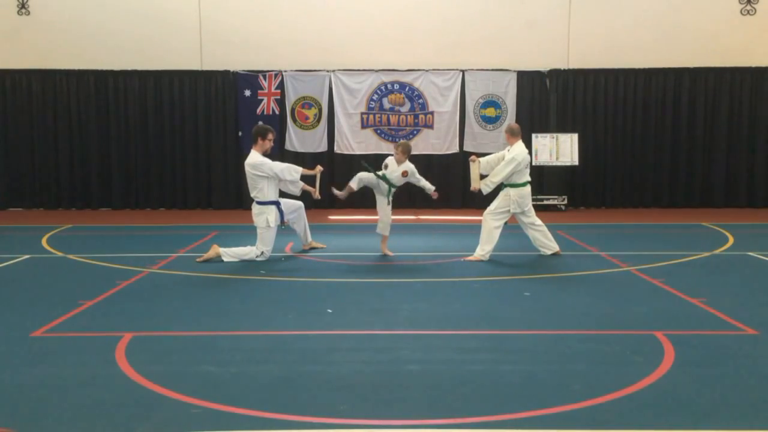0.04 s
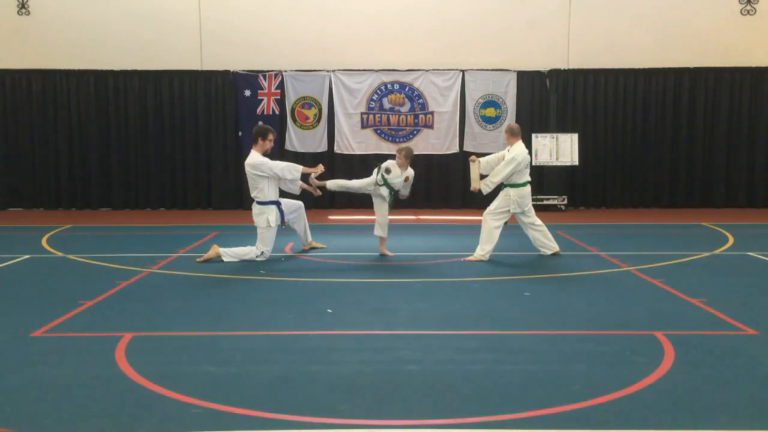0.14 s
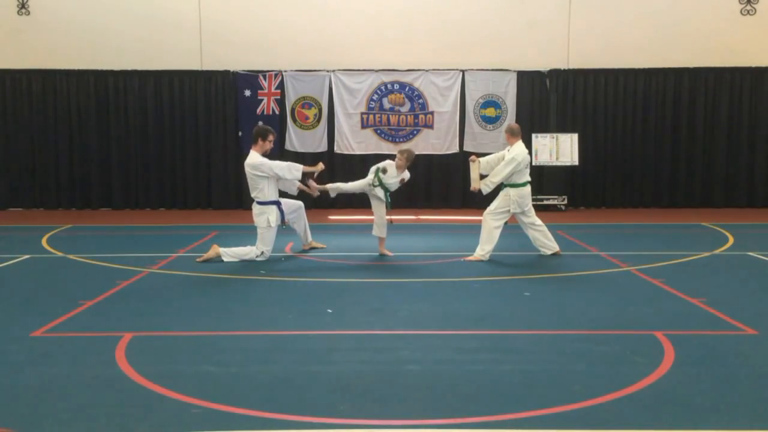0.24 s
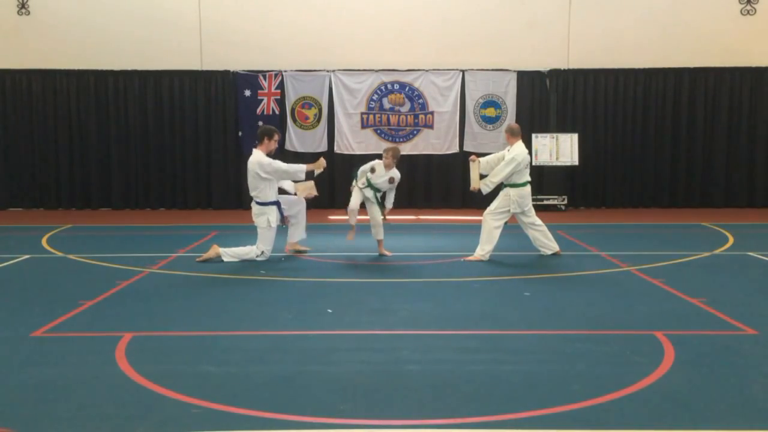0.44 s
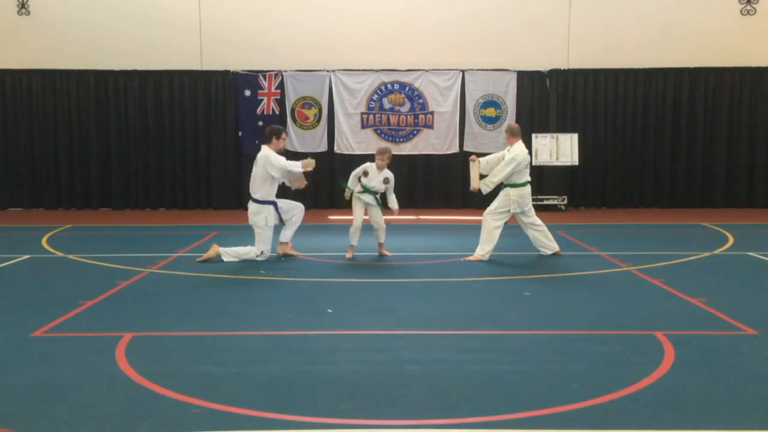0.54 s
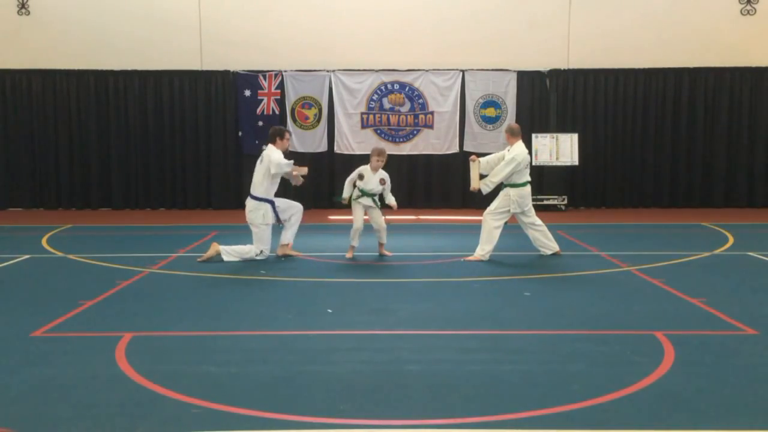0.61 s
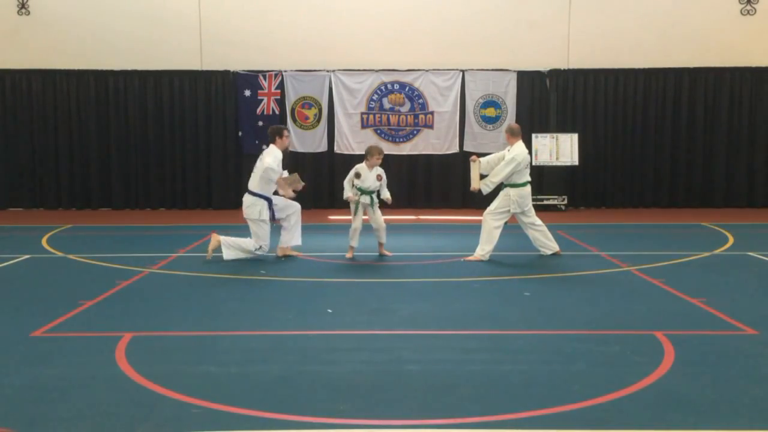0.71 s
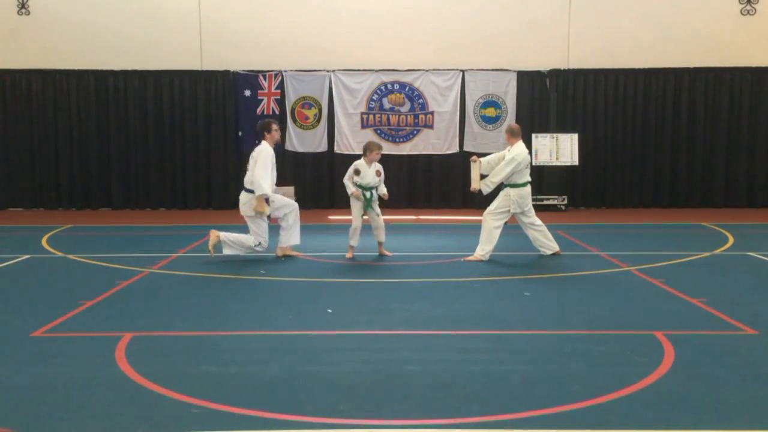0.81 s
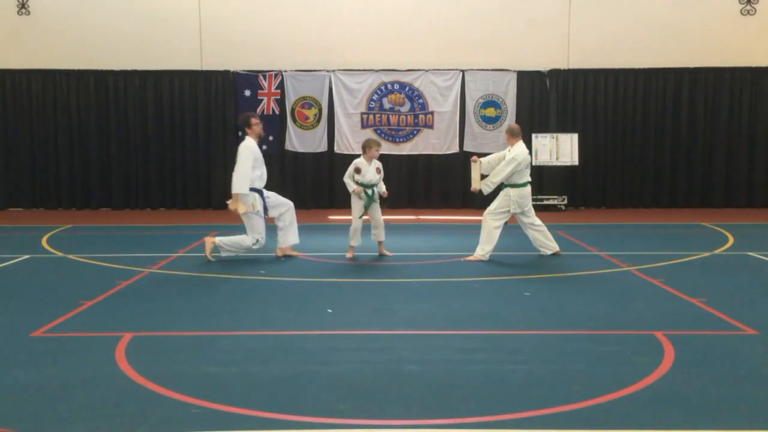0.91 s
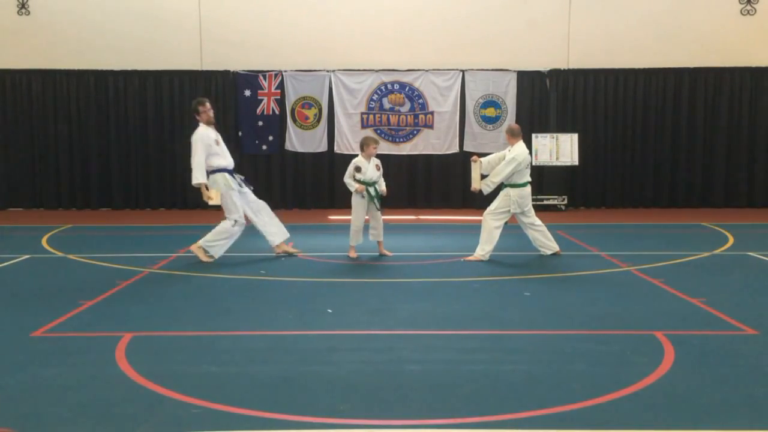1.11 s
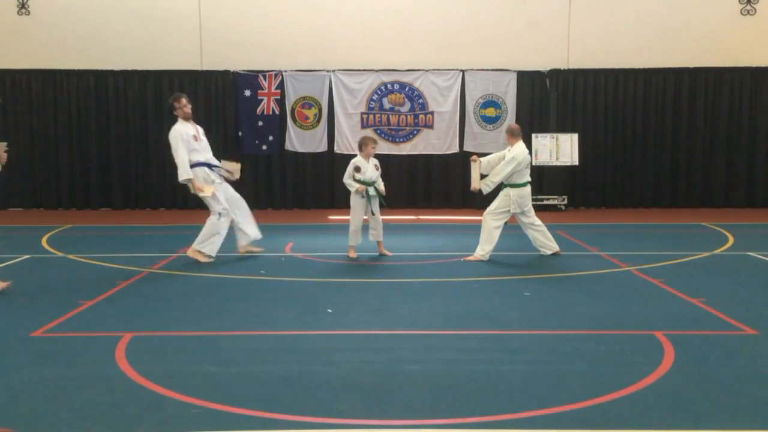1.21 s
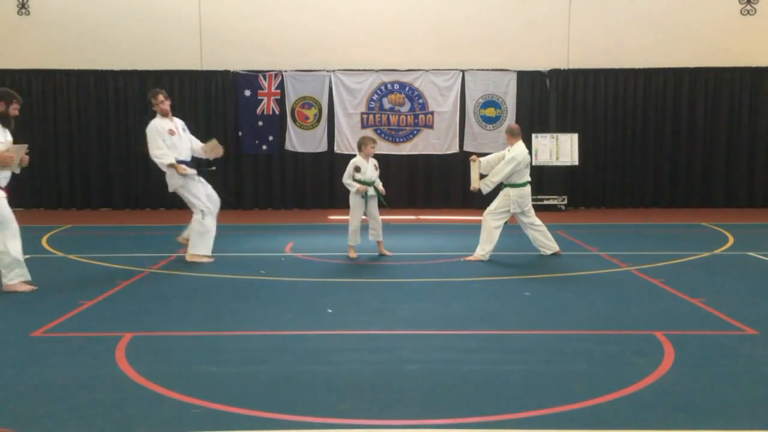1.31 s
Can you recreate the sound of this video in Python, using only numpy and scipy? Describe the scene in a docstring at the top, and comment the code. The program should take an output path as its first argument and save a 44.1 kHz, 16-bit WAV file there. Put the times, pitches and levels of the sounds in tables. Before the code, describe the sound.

A wooden board snaps under a kick, the sharp crack echoing through a large hall.

```python
"""A wooden board breaks under a kick, several metres from the microphone in a large sports hall.
The foot slaps the wood, the fibres snap within milliseconds and the halves ring briefly. Hard surfaces
throw the crack back, and the hall rings on over soft thuds of feet on the floor, faint swishes of a
uniform and a low room rumble. The microphone rounds off the highest peaks."""
import sys
import numpy as np
from scipy import signal
from scipy.fft import rfft, irfft
from scipy.io import wavfile

SR = 44100
rng = np.random.default_rng(int(sys.argv[2]) if len(sys.argv) > 2 else 0)


def generate_wav(signal):
    """Clip the signal to [-1, 1] and save it as 16-bit WAV at the path in sys.argv[1]."""
    frames = np.transpose(np.atleast_2d(signal))
    scaled = np.clip(frames, -1, 1) * 32767
    pcm = np.round(scaled).astype(np.int16)
    wavfile.write(sys.argv[1], SR, pcm)


N = 59535
T = np.arange(N) / SR
HZ = np.maximum(np.arange(N + 1) * SR / (2 * N), 1)   # bins of an FFT padded to 2 N
SLAP_S, CRACK_S, HALL_ONSET_S = 0.2043, 0.2129, 0.232   # arrivals at the microphone

# The foot on the wood. Each row: frequency in Hz, relative level in dB.
SLAP_SPECTRUM = [(60, -3), (220, 10.5), (450, 2), (1000, -13), (3000, -5.5), (6400, -11), (7800, -16),
                 (15000, -23.5)]
# The fibres giving way. Each row: frequency in Hz, relative level in dB.
CRACK_SPECTRUM = [(200, -33), (600, -25), (1050, -9), (1350, -13), (1640, -9), (2000, -2), (2700, 5),
                  (3600, -13), (5000, -0.5), (5450, -11), (6300, 1.5), (6800, -37), (7700, -27),
                  (8500, -13.5), (9700, -17), (11000, -25), (15500, -30)]
# The ring of the halves. Each row: frequency in Hz, relative level in dB, T60 in seconds.
BOARD_MODES = [(795, -11, 0.077), (986, -8, .05), (1087, -4.5, 0.062), (1633, 0.5, 0.051),
               (2654, -9, 0.075), (2912, -2.5, 0.044), (3210, -6, 0.047), (3990, -12, 0.035),
               (4800, -20, 0.017), (6480, -7, 0.034), (6970, -19, 0.12)]
# Strong early echoes off hard surfaces. Each row: start in seconds, level in dB, hold in seconds.
EARLY_ECHOES = [(0.2415, -27.5, 0.0036), (0.2466, -20, 0.003), (0.2514, -12.5, 0.0021)]
# The tone of those echoes and of nearby scatter. Each row: frequency in Hz, relative level in dB.
EARLY_SPECTRUM = [(200, -14.5), (520, -20.5), (900, 1), (1300, 3), (1900, -1.5), (2500, -2), (3000, 0),
                  (3500, 4), (4300, 0.5), (5500, -13), (6300, -6.5), (7200, -31), (9500, -27), (12500, -31),
                  (15500, -33)]
# Weaker, duller returns. Each row: start in seconds, level in dB, ringing frequency in Hz.
LATE_ECHOES = [(.293, -24.5, 3070), (0.304, -27.5, 2500), (0.3475, -27, 1950), (0.507, -32.5, 2400),
               (0.666, -39, 2230), (0.7627, -41, 1770), (0.934, -48.5, 1990), (1.032, -54, 3350)]
# The tone of the late returns. Each row: frequency in Hz, relative level in dB.
LATE_SPECTRUM = [(300, -13.5), (1000, 0), (1800, -1.5), (2800, 1), (3500, 0.5), (4800, -17), (7000, -18.5),
                 (14000, -47)]
# The boom of the kick, then feet on the floor.
# Each row: start in seconds, relative level in dB, frequency in Hz above which the blow weakens.
THUDS = [(.236, -26.5, 350), (0.294, -34, 260), (.357, -30.5, 260), (0.419, -32.5, 130), (0.577, -39, 109),
         (.668, -38, 110), (.785, -39, 160), (.948, -48, 160), (1.089, -36, 100), (1.155, -49.5, 150)]
# The floor's boom. Each row: frequency in Hz, relative level in dB, T60 in seconds.
FLOOR_MODES = [(86, -3.5, 0.1), (112, -1, .14), (139.7, 0, 0.13), (201, -7.5, 0.26), (370, -7.5, 0.18)]
# The hall's reverberation. Each row: frequency in Hz, relative level in dB.
HALL_SPECTRUM = [(30, -25), (60, -7.5), (100, -10), (170, -4), (275, 4), (420, -7.5), (520, -5.5), (760, 0),
                 (890, -7), (1050, 2.5), (1500, -3), (2300, -2), (3030, -1.5), (3500, 7), (4150, 6),
                 (5350, -5.5), (6500, 0), (7300, -14), (9200, -13.5), (11000, -22.5), (12500, -22),
                 (15500, -44)]
# How long the hall rings. Each row: frequency in Hz, T60 in seconds.
HALL_DECAY = [(80, 7), (210, 3.54), (560, 2.01), (1500, 2.5), (3800, 1.757), (6500, 1.46), (10000, 0.89),
              (15000, 0.79)]
# Peaks and dips in the echoes and tail: low hall notes, the board's ring above.
# Each row: centre in Hz, width in Hz, lift in dB.
TAIL_COLOUR = [(98, 16, 13), (140.9, 12, 15), (203, 45, 5.5), (305, 19, -2), (360, 12, 8.5),
               (483.9, 10, 12), (594, 40, 9), (699.5, 52, 7.5), (1000, 34, 2), (1304, 20, 6.5),
               (1700, 110, 4.5), (2004, 59, 5), (2226, 40, 7), (2562, 227, 6), (3192, 61, 3.5),
               (3678, 31, -11), (4350, 130, -4.5)]
# Low notes that the hall holds. Each row: frequency in Hz, level in dB, T60 in seconds.
STANDING_WAVES = [(100.9, -45.5, 3.3), (222.7, -38.5, 2.26), (230.1, -43.5, 2.26), (369.5, -49.5, 2.37)]
# Cloth on the swinging leg. Each row: frequency in Hz, relative level in dB.
SWING_SPECTRUM = [(500, -24), (1200, -12), (2100, 1), (3500, 1), (5200, -12), (6400, -2), (7600, -22),
                  (15000, -34)]
# Swishes of the uniform after the kick. Each row: centre in seconds, level in dB, half length in seconds.
SWISHES = [(.622, -65.5, 0.015), (1.225, -76, .007)]
# Cloth brushing cloth. Each row: frequency in Hz, relative level in dB.
SWISH_SPECTRUM = [(3000, -12), (9000, 8), (12000, 3.5), (15000, -4), (16000, -15)]
# The hall's room tone. Each row: frequency in Hz, relative level in dB.
ROOM_SPECTRUM = [(25, -28), (45, -19.5), (80, 0.5), (130, -2), (200, -4), (250, -14.5), (295, -5.5),
                 (360, -24), (440, -9.5), (520, -20), (620, -25), (900, -29.5), (2200, -29.5), (4000, -37),
                 (5500, -44.5), (10000, -47), (15000, -51.5)]


def board_break():
    """Several metres off, the foot slaps, fibres snap, the halves ring; floor and people scatter it."""
    slap = knock(SLAP_S, db=-38.5, hold_s=0, t60=0.42, spectrum=SLAP_SPECTRUM)
    snaps = knock(CRACK_S, db=-15.5, hold_s=0.0013, t60=0.0095, spectrum=CRACK_SPECTRUM, per_s=11000)
    scatter = knock(CRACK_S + 0.0012, db=-29, hold_s=0, t60=0.17, spectrum=EARLY_SPECTRUM)
    halves = from_db(-23) * ring(CRACK_S, BOARD_MODES)
    return slap + snaps + scatter + halves


def echoes():
    """The crack returns to the microphone smeared: strong at first, then as dull claps in the tail."""
    early = sum(knock(start, db, hold_s, t60=0.0031, spectrum=EARLY_SPECTRUM, resonances=TAIL_COLOUR)
                for start, db, hold_s in EARLY_ECHOES)
    width_hz, lift_db = 250, 6.5
    late = 0
    for start, db, hz in LATE_ECHOES:
        peak = (hz, width_hz, lift_db)
        late += knock(start, db, hold_s=0.0017, t60=0.067, spectrum=LATE_SPECTRUM, resonances=[peak])
    return early + late


def floor_thuds():
    """Soft blows boom in the floor, the softest mainly in its low modes; it radiates little deep bass."""
    boom = 0
    for start, db, top_hz in THUDS:
        modes = [(hz, db + mode_db - 10 * np.log10(1 + (hz / top_hz) ** 4), t60)
                 for hz, mode_db, t60 in FLOOR_MODES]
        boom += fade_in(start, rise_s=0.0028) * ring(start, modes)
    bass_cut = signal.butter(2, 77.5, "high", fs=SR, output="sos")
    return signal.sosfilt(bass_cut, boom)


def hall_reverb():
    """Dense reflections build up around the microphone, then die band by band, the treble first."""
    build_s = 0.024
    age = T - HALL_ONSET_S - build_s
    first_reflections = from_db(-1) * decay(age, t60=0.26)
    # A flutter between facing walls stands out more and more as the tail thins.
    period_s, crest_s, flutter_above_hz = 0.0523, 1.144, 900
    flutter_db = 2.9 * age ** 2 * np.cos(2 * np.pi * (T - crest_s) / period_s)
    noise_bins = rfft(colour(rng.standard_normal(N), HALL_SPECTRUM, TAIL_COLOUR), 2 * N)
    centres_hz = np.geomspace(50, 16000, num=18)
    reverb = 0
    for hz, weights in zip(centres_hz, np.eye(len(centres_hz))):
        triangle = np.interp(np.log(HZ), np.log(centres_hz), weights)
        band = irfft(noise_bins * triangle)[:N]
        tail = decay(age, at_hz(HALL_DECAY, hz)) * from_db(flutter_db * (hz > flutter_above_hz))
        reverb += band * np.hypot(tail, first_reflections)
    return from_db(-28.5) * fade_in(HALL_ONSET_S, build_s) * reverb


def standing_waves():
    """The hall's low notes swell after the blow and hum on."""
    return fade_in(HALL_ONSET_S, rise_s=0.07) * ring(HALL_ONSET_S, STANDING_WAVES)


def uniform_rustle():
    """Barely heard at this distance, cloth rustles as the leg speeds up, then brushes past itself."""
    swing_start_s = 0.054
    swing = from_db(-70) * np.sqrt(fade_in(swing_start_s, SLAP_S - swing_start_s)) * (T < CRACK_S)
    brush = sum(from_db(db) * np.exp(-((T - centre) / half) ** 2) for centre, db, half in SWISHES)
    noise = rng.standard_normal(N)
    return swing * colour(noise, SWING_SPECTRUM) + brush * colour(noise, SWISH_SPECTRUM)


def room_tone():
    """The hall's steady low rumble and faint hiss lie under everything."""
    return from_db(-55) * colour(rng.standard_normal(N), ROOM_SPECTRUM)


def knock(start, db, hold_s, t60, spectrum, resonances=(), per_s=SR):
    """Tiny clicks of random sign hold their level, then die; once coloured, they keep their energy."""
    envelope = (T >= start) * decay(T - start - hold_s, t60)
    clicks = rng.choice([-1, 1], N) * (rng.random(N) < per_s / SR) * envelope
    rms = from_db(db) * np.sqrt(np.mean(envelope ** 2))
    return rms * unit_rms(colour(clicks, spectrum, resonances))


def ring(start, modes):
    """Struck modes: dying sines, neighbours of opposite sign."""
    age = np.maximum(T - start, 0)
    return sum((-1) ** k * from_db(db) * decay(age, t60) * np.sin(2 * np.pi * hz * age)
               for k, (hz, db, t60) in enumerate(modes))


def colour(x, spectrum, resonances=()):
    """Minimum-phase filter with the given spectrum and resonances, at unit power gain."""
    peaks_db = sum(lift * np.exp(-((HZ - hz) / width) ** 2) for hz, width, lift in resonances)
    gain = unit_rms(from_db(at_hz(spectrum, HZ) + peaks_db))
    cepstrum = irfft(np.log(gain))
    cepstrum[1:N] *= 2   # folded onto positive time, so nothing sounds ahead of its cause
    cepstrum[N + 1:] = 0
    return irfft(rfft(x, 2 * N) * np.exp(rfft(cepstrum)))[:N]


def fade_in(start, rise_s):
    """A straight rise from silence to full level."""
    return np.clip((T - start) / rise_s, 0, 1)


def decay(age, t60):
    """Full level until age zero, then down 60 dB every t60 seconds."""
    return from_db(-60 * np.maximum(age, 0) / t60)


def at_hz(points, hz):
    """Read a table on a log-frequency axis."""
    table_hz, values = np.transpose(points)
    return np.interp(np.log(hz), np.log(table_hz), values)


def from_db(db):
    """Decibels to gain."""
    return 10 ** (np.asarray(db) / 20)


def unit_rms(x):
    """Scale to unit rms."""
    return x / np.sqrt(np.mean(x ** 2) + 1e-20)


def scene():
    """The break and the hall as they reach one microphone."""
    blows = board_break() + echoes() + floor_thuds()
    return (blows + hall_reverb() + standing_waves() + uniform_rustle() + room_tone())[None]


def record(dry):
    """The microphone rounds the highest peaks, and the top treble is cut steeply."""
    ceiling, cutoff_hz = 0.42, 15750
    rounded = dry / (1 + (dry / ceiling) ** 6) ** (1 / 6)
    treble_cut = signal.ellip(10, 0.1, 80, cutoff_hz, fs=SR, output="sos")
    return signal.sosfilt(treble_cut, rounded)


dry = scene()
out = record(dry)
generate_wav(out)
```